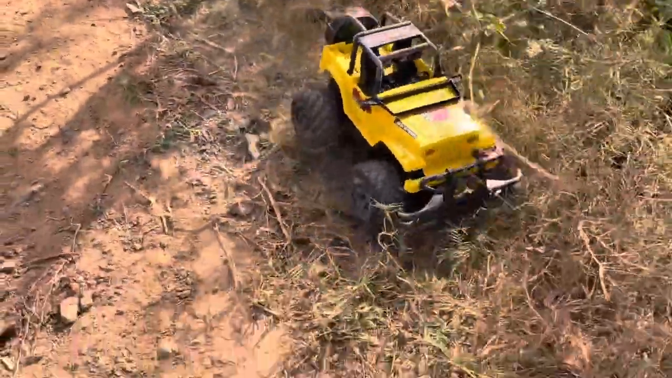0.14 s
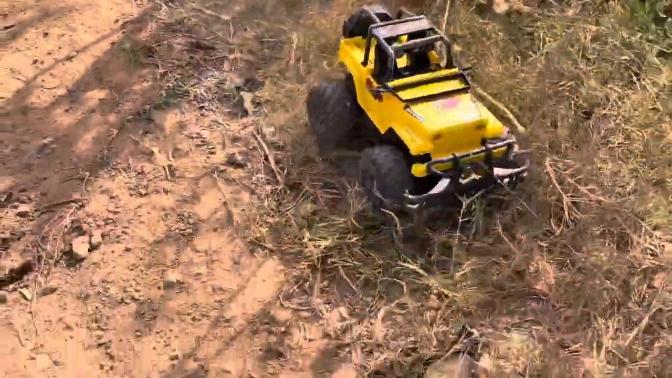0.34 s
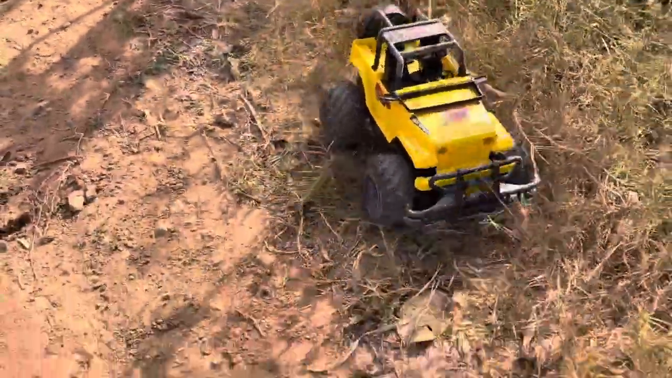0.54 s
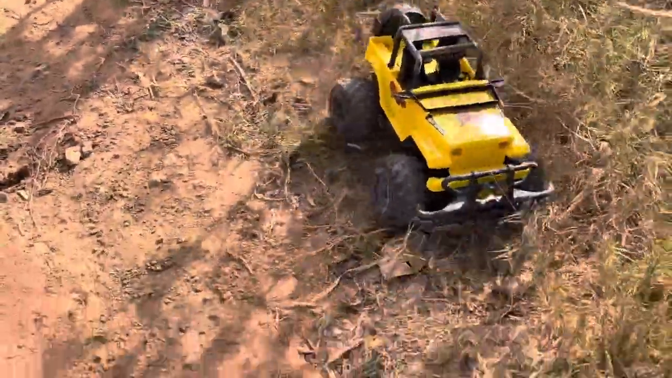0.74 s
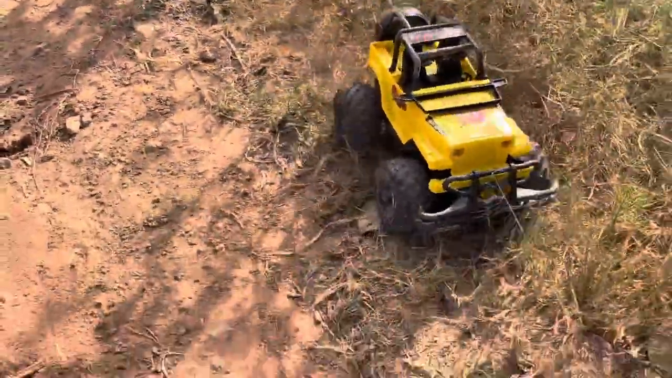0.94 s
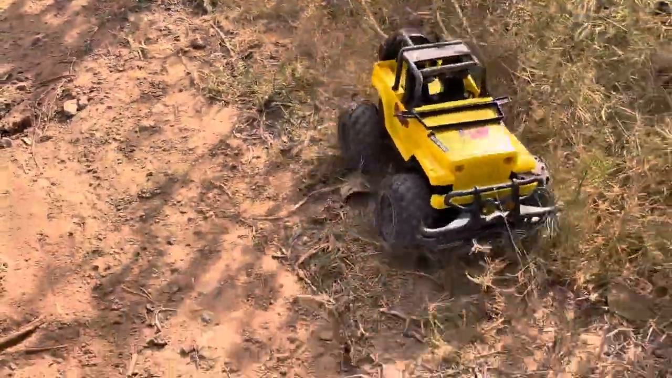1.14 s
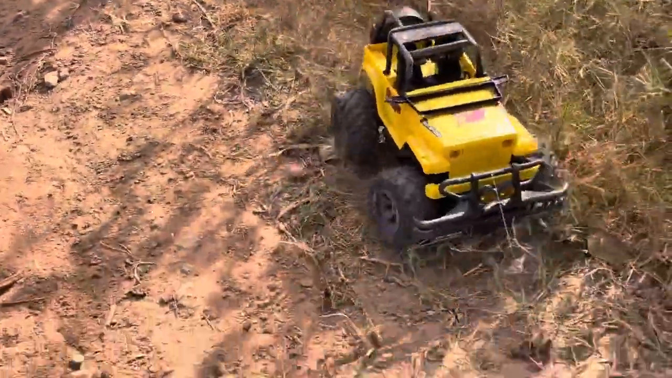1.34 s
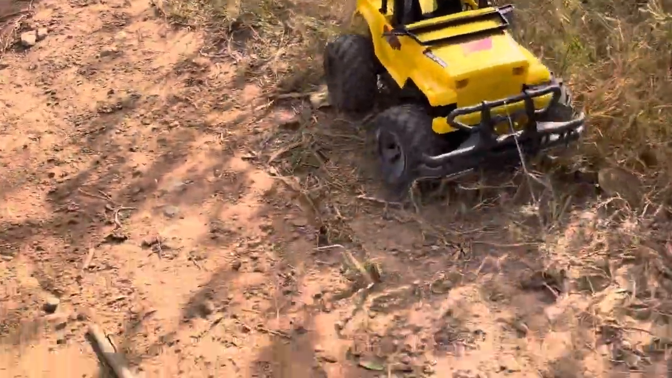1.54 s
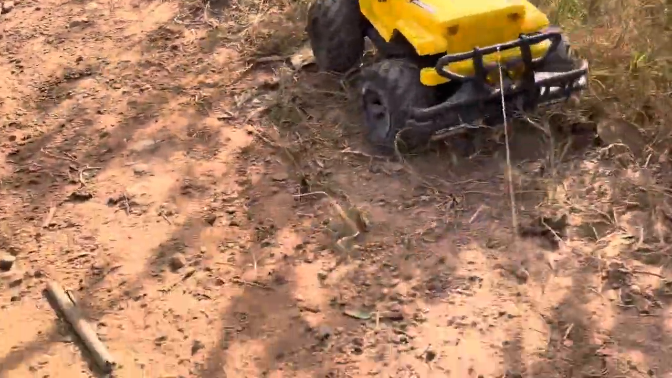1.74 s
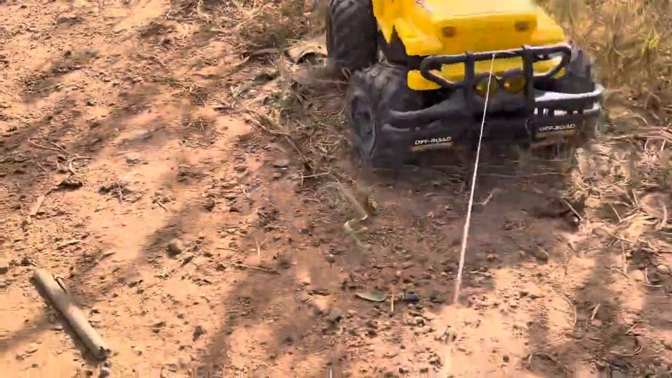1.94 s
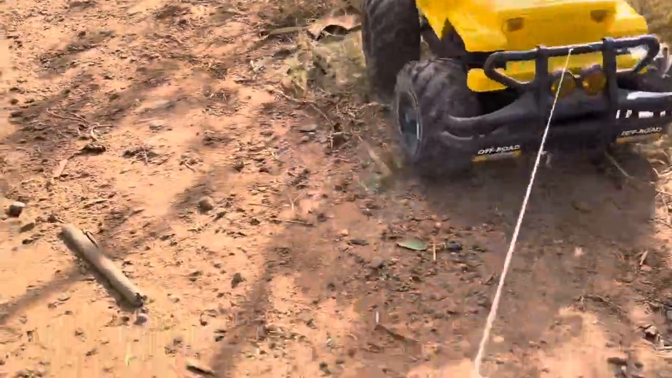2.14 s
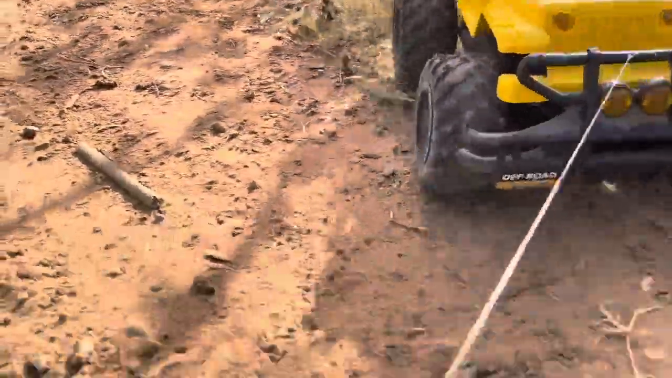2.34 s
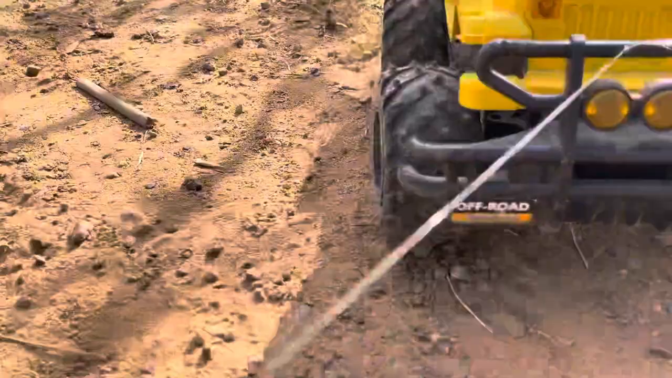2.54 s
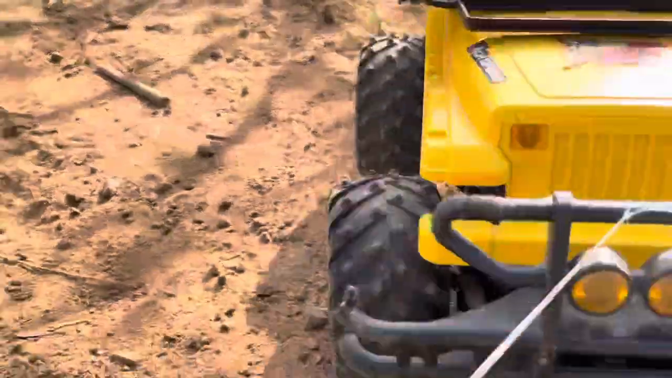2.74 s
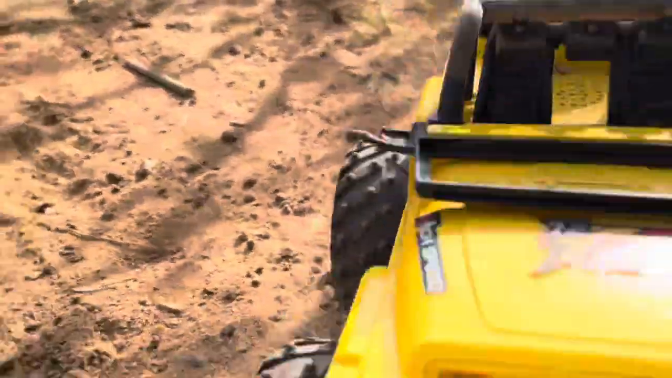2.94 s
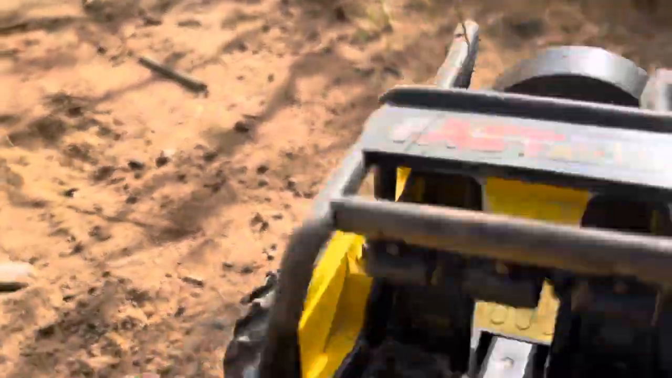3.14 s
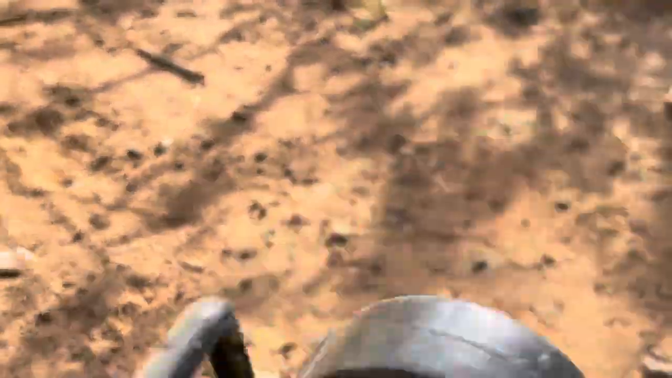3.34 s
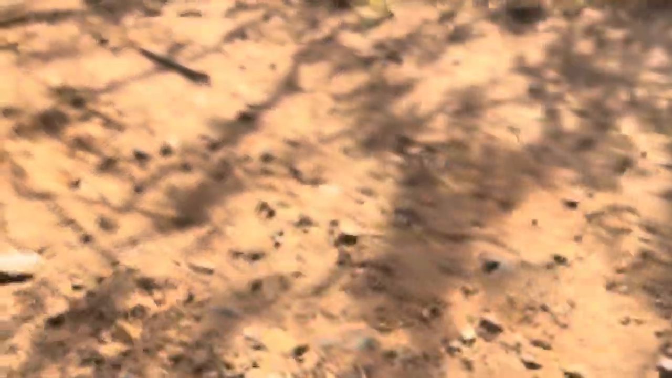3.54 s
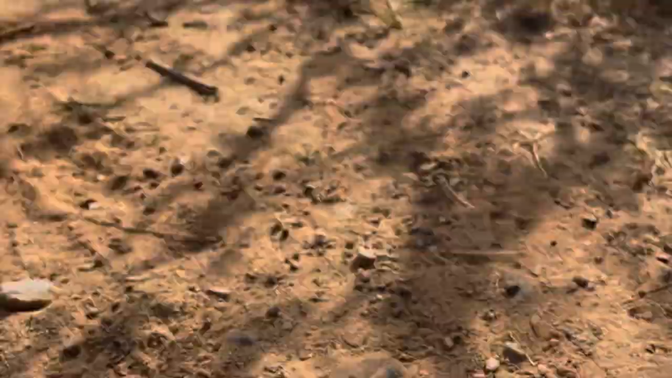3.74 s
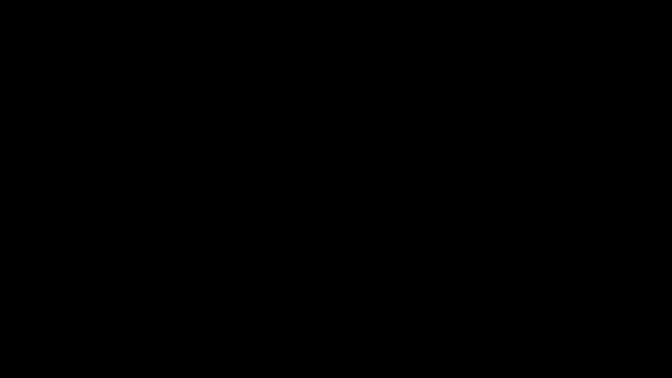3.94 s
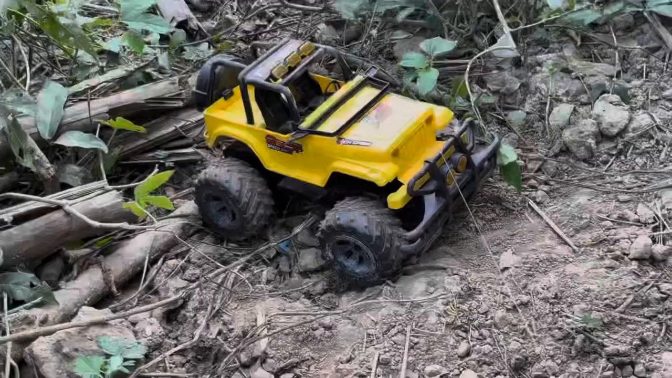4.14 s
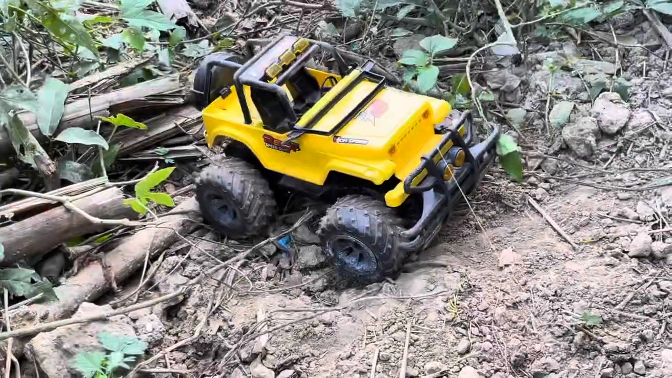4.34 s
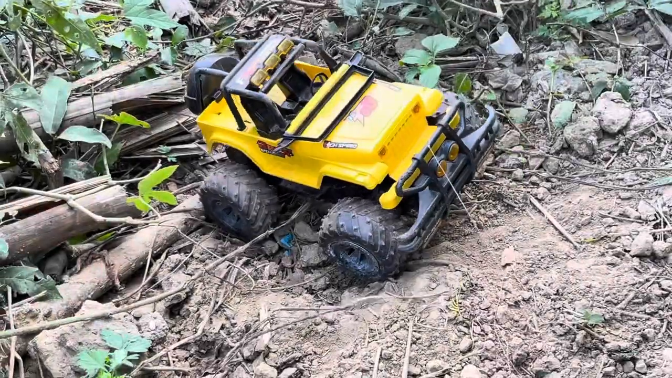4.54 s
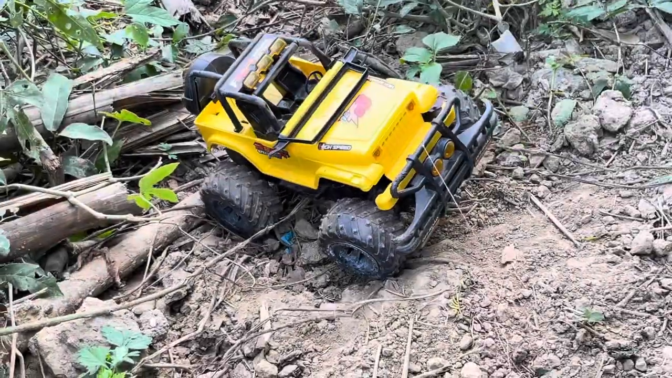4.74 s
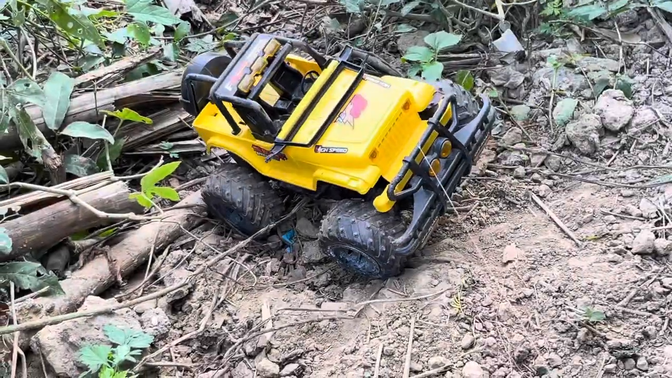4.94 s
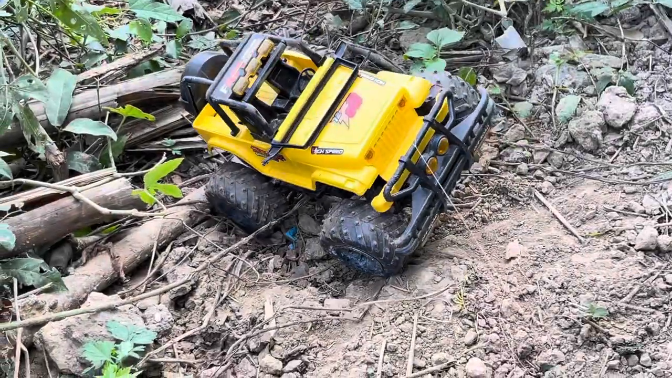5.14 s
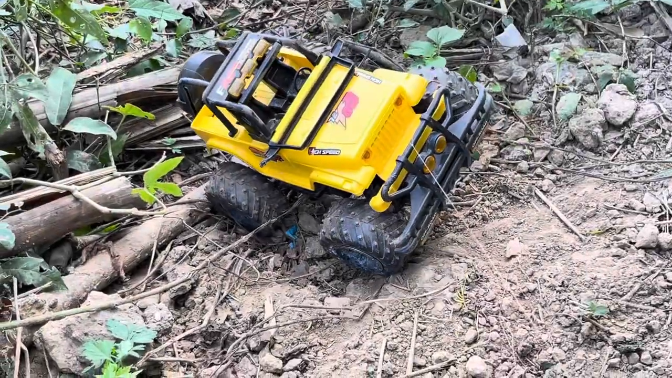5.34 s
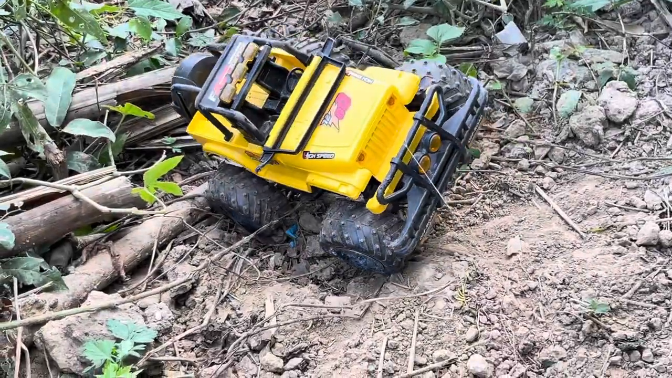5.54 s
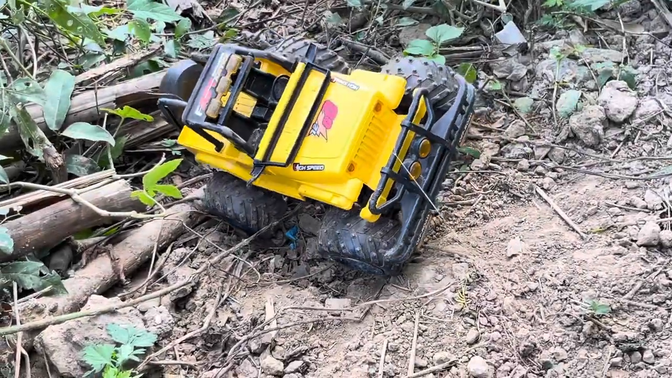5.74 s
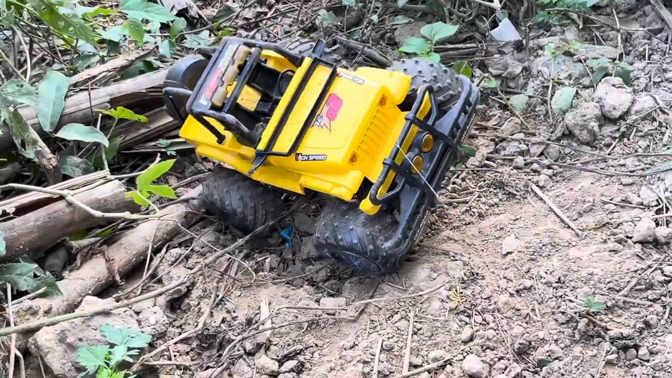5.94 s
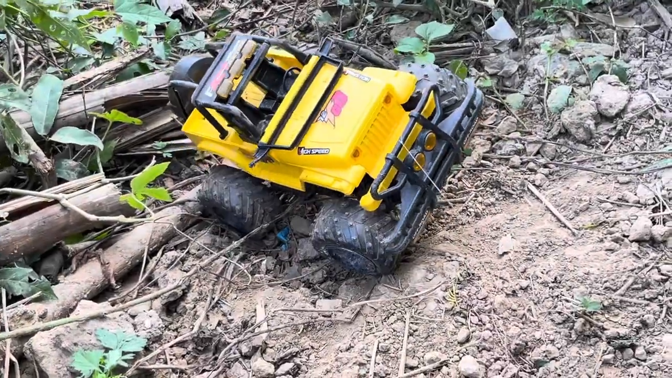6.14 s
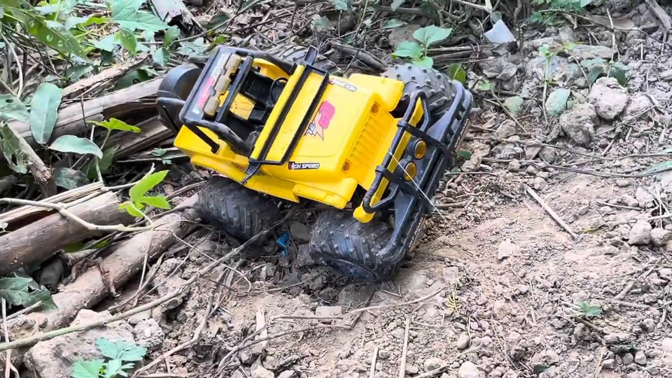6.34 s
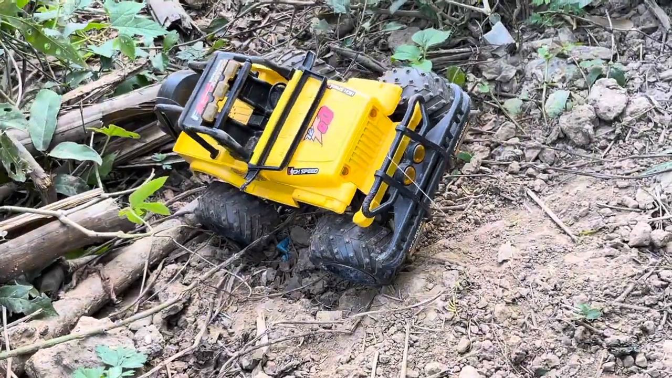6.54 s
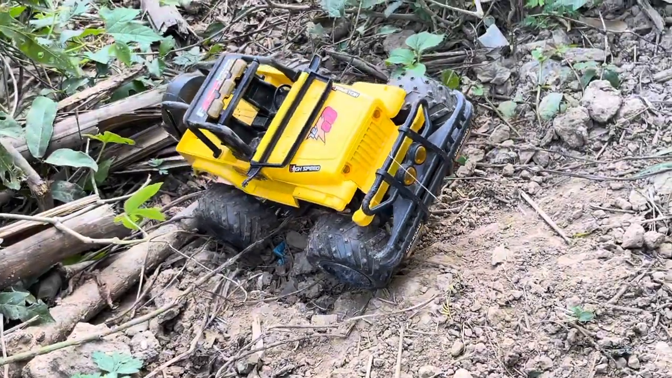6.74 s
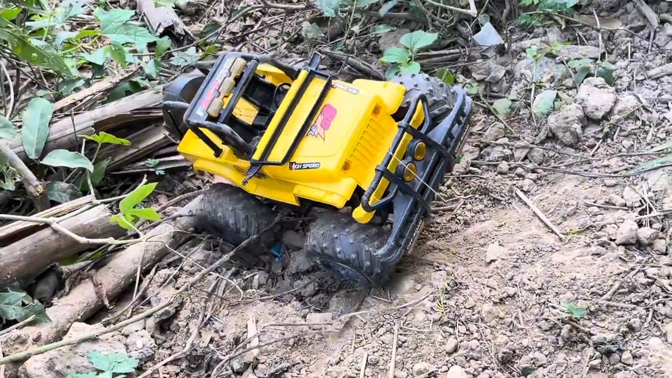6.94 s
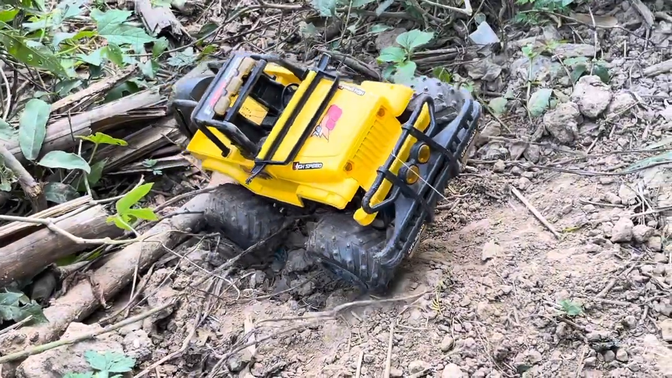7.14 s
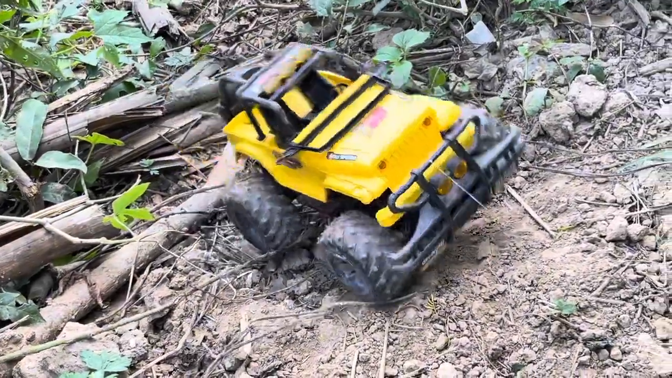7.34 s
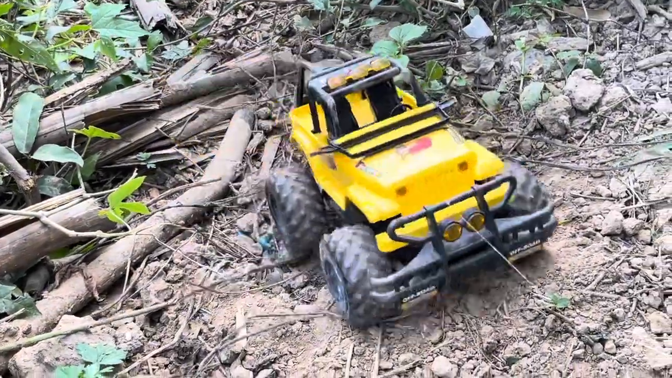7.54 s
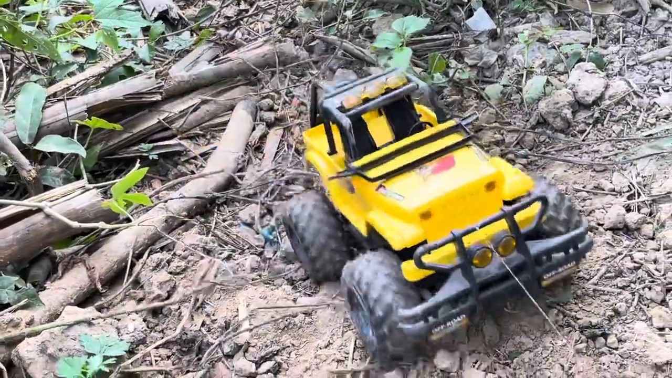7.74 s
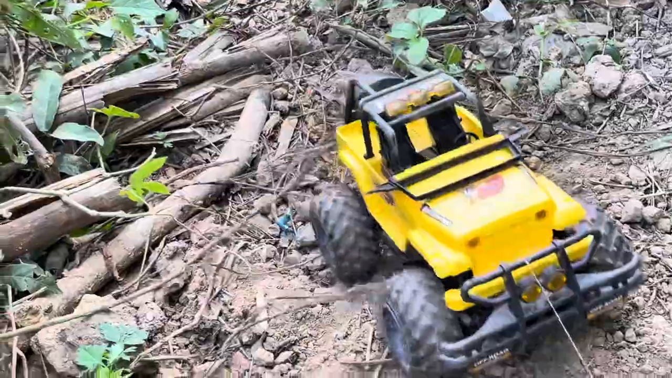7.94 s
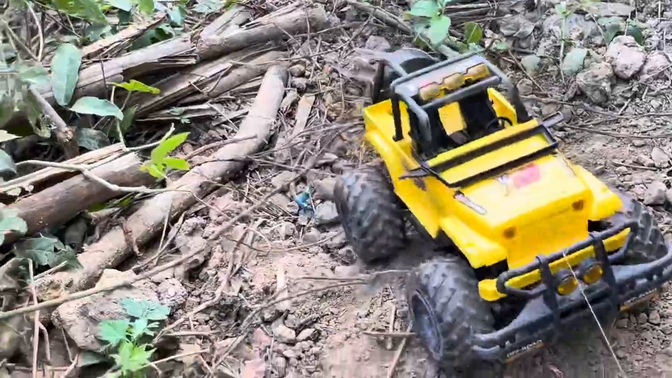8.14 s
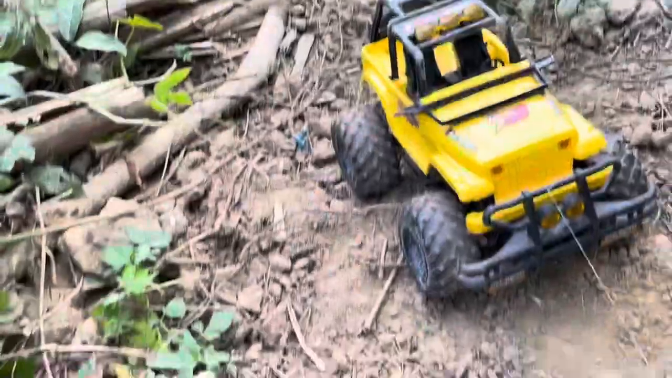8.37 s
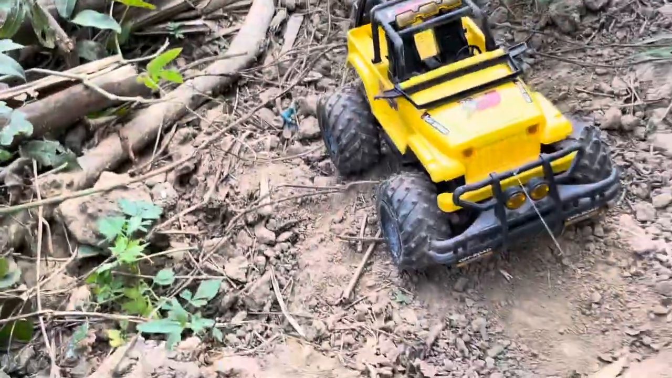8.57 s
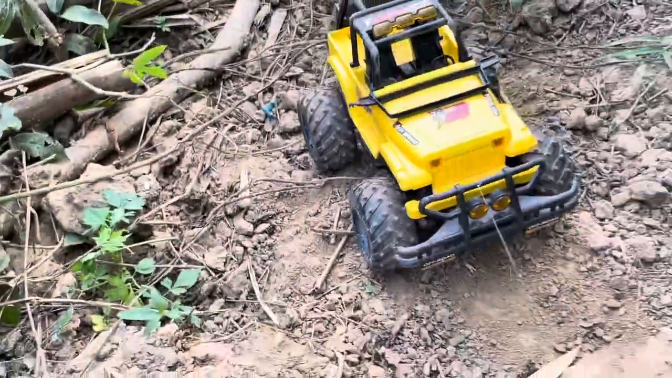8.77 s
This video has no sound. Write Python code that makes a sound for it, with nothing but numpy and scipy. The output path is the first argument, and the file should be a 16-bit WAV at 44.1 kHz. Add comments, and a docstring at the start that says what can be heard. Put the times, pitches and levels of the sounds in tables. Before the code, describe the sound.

Dry stems snap and grit crackles loudly as a toy truck passes close, then a quiet wood with distant engine thuds, rasping calls and gear ticks.

```python
"""In a wood, a plastic toy truck is pulled on a string through dry grass, over gritty soil and past the microphone.
Then, in another spot, it strains at a rut, lurches free and rolls on with its gears ticking.
Rubbing and breakage are coloured noise under chance envelopes; snaps, knocks and ticks are decaying bursts.
Behind it a far diesel thuds as a filtered pulse train, and something in the bushes, perhaps a bird,
rasps as pulses ringing resonances; a drone, rising hums, chirps and a faint hiss lie behind."""
import sys
import numpy as np
from scipy import signal
from scipy.fft import rfft, irfft
from scipy.io import wavfile
from scipy.ndimage import uniform_filter1d

SR = 44100
rng = np.random.default_rng(int(sys.argv[2]) if len(sys.argv) > 2 else 0)


def wrap_up_sound(samples):
    """Save the sound to the file named by the first command line argument, as 16-bit audio."""
    columns = np.atleast_2d(samples).T
    # keep every value between -1 and 1, then stretch to whole-number steps
    tamed = np.clip(columns, -1, 1)
    steps = np.round(tamed * 32767).astype(np.int16)
    wavfile.write(sys.argv[1], SR, steps)


N = 388319
TIME = np.arange(N) / SR

CUT_S, RESUME_S = 3.964, 3.973  # the first spot ends, the second begins
SOIL_S = 1.62  # the wheels leave the grass here
# spectrum of crushed grit and soil: f/Hz, density/dB per Hz (relative)
GRIT_COLOUR = [(120, -45), (200, -3), (504, -3.5), (630, -1), (762, 0.5), (852, -2), (1420, 0.5),
               (2050, 0.5), (2520, -4), (2770, -5), (4680, -8), (6540, -14), (9000, -18.5), (11700, -60.5),
               (19800, -120)]
# spectrum of a bright dry fracture: f/Hz, density/dB per Hz (relative)
SNAP_COLOUR = [(800, -22), (2000, 4), (3500, 2.5), (5500, 2), (8300, 5.5), (9500, 7.5), (10300, -10),
               (11500, -1), (13000, -16.5), (15500, -83)]


def undb(db):
    """Amplitude gain is ten to the power of a twentieth of the level in decibels."""
    return 10 ** (np.asarray(db) / 20)


def unit(x):
    """Normalisation to a root-mean-square of 1."""
    return x / np.sqrt(np.mean(x ** 2) + 1e-18)


def curves(table):
    """Linear interpolation in time of each column after the first."""
    s, *columns = np.transpose(table)
    return [np.interp(TIME, s, c) for c in columns]


def gains(points, hz):
    """Frequency response: levels interpolated along a logarithmic frequency axis."""
    f, db = np.transpose(points)
    return undb(np.interp(np.log(hz + 1), np.log(f), db))


def colour(x, points, size=8192):
    """Minimum-phase filtering: a folded cepstrum gives a causal response, scaled to keep white-noise power."""
    cepstrum = irfft(np.log(gains(points, np.arange(size // 2 + 1) * SR / size)))
    cepstrum[1:size // 2] *= 2
    cepstrum[size // 2 + 1:] = 0
    response = irfft(np.exp(rfft(cepstrum)))
    return signal.fftconvolve(x, response / np.linalg.norm(response))[:len(x)]


def resonate(x, hz, width_hz):
    """Second-order resonance with gain 1 at its centre."""
    return signal.lfilter(*signal.iirpeak(hz, hz / width_hz, fs=SR), x)


def walk(rate):
    """Slow random modulation: held random values smoothed twice, with a spread near 1."""
    k = max(int(SR / rate), 1)
    steps = np.repeat(rng.standard_normal(N // k + 1), k)
    return unit(uniform_filter1d(uniform_filter1d(steps, k), k))[:N]


def between(start, end, fade):
    """Gating window: 1 between two times, with linear fades inside its edges."""
    return np.clip((TIME - start) / fade, 0, 1) * np.clip((end - TIME) / fade, 0, 1)


def add(track, s, sound):
    """Superposition of a sound on a track from a given time."""
    i = max(int(s * SR), 0)
    track[i:i + len(sound)] += sound[:max(N - i, 0)]


def burst(t60, size=8192):
    """Exponential decay of white noise, falling 60 dB in t60 seconds (2 ms at least)."""
    return rng.standard_normal(size) * np.exp(-np.log(1000) * np.arange(size) / SR / max(t60, .002))


def stereo(x, pan_db=0, width_db=0, spread_db=-40, spread_hz=10):
    """Mid-side stereo: a quadrature side gives width, a wandering side scatter, an in-phase side a lean."""
    # side minus mid before width_db: f/Hz, level/dB
    width_colour = [(60, -20.5), (300, -8.5), (1300, -4), (4500, -30.5), (6800, -29), (8300, -16),
                    (9500, 14.5), (12000, 8.5), (15000, 8)]
    # scatter before spread_db, strongest in the middle of the range: f/Hz, level/dB
    spread_colour = [(100, -7.5), (500, -15), (1300, -1), (2500, -4.5), (5000, -4), (8000, -1),
                     (12000, -5.5)]
    # how strongly each band leans to the side of the source: f/Hz, level/dB
    lean_colour = [(60, -4.5), (700, -6), (1300, 2.5), (4500, 3.5), (8000, 1), (15000, -16)]
    hz, spectrum = np.arange(N // 2 + 1) * SR / N, rfft(x)
    side = irfft(spectrum * 1j * gains(width_colour, hz), N) * undb(width_db)
    side += undb(spread_db) * irfft(spectrum * gains(spread_colour, hz), N) * walk(spread_hz)
    if np.any(pan_db):
        balance = (undb(pan_db) - 1) / (undb(pan_db) + 1)
        side += irfft(spectrum * gains(lean_colour, hz), N) * balance
    return np.array([x + side, x - side])


def biting():
    """Power addition: each bite of the tread swells over steady rubbing; returns a level in dB."""
    # rubbing as the pull varies, through the grass and past the microphone: t/s, level/dB
    pull = [(0, -54), (.44, -48), (.68, -52.5), (.78, -41), (.92, -52), (1.28, -43), (1.52, -58),
            (1.8, -52), (1.93, -47.5), (2.15, -48.5), (2.19, -35), (2.48, -34), (2.63, -34), (2.8, -31),
            (2.93, -30), (3.16, -37.5), (3.45, -38.5), (3.62, -36), (3.96, -46)]
    # the tread bites into the soil and lets go: t/s at the top, level/dB, length/s
    bites = [(1.908, -45.5, 0.034), (1.967, -43.5, 0.021), (1.989, -52, 0.016), (2.098, -40.5, 0.043),
             (2.196, -25.5, 0.0078), (2.23, -31.5, 0.011), (2.246, -34.5, 0.026), (2.296, -31, 0.038),
             (2.425, -34.5, 0.015), (2.531, -24, 0.026), (2.58, -36, 0.035), (2.687, -26, 0.017),
             (2.707, -22.5, 0.029), (2.742, -25, 0.025), (2.769, -26, 0.024), (2.828, -27, 0.032),
             (2.907, -20.5, 0.019), (2.977, -29, 0.022), (3.009, -24.5, 0.051), (3.053, -26.5, 0.029),
             (3.122, -24, 0.043), (3.179, -29.5, 0.016), (3.222, -23.5, .035), (3.262, -29, 0.027),
             (3.307, -26.5, 0.044), (3.342, -32, 0.029), (3.39, -24, 0.049), (3.464, -25.5, 0.026),
             (3.515, -41, 0.027), (3.783, -50, 0.027), (3.874, -37, 0.048)]
    power = undb(curves(pull)[0]) ** 2
    for s, db, length in bites:
        power = power + undb(db) ** 2 * np.exp(-np.minimum((2 * (TIME - s) / length) ** 2, 20))
    return 10 * np.log10(power)


def tonal_grain(rate, spread_db, cycles, count=36):
    """Impulse excitation of resonators: sparse narrow rings at chance pitches give the crackle a tonal grain."""
    out = np.zeros(N)
    for hz in np.geomspace(500, 10000, count) * rng.uniform(.96, 1.04, count):
        taps = np.zeros(N)
        draws = rng.random((int(rate * N / SR / count), 2))
        places = (draws[:, 0] * N).astype(int)
        taps[places] = undb(-spread_db * np.log(0.0292 + 0.92 * draws[:, 1]))
        # flat on average
        out += np.sqrt(hz) * unit(resonate(taps, hz, hz / cycles))
    return unit(out)


def fractures(rate, spread_db, t60, bed):
    """Random point process: many tiny breaks of unequal size decay over a bed of rubbing; rms 1."""
    largest = 3  # limit on the exponential draw
    sizes = undb(spread_db * np.minimum(rng.exponential(size=N), largest)) * (rng.random(N) < rate / SR)
    power = signal.lfilter([1], [1, -np.exp(-2 * np.log(1000) / (t60 * SR))], sizes ** 2)
    # even out the local mean power
    power = power / (uniform_filter1d(power, size=1500) + 1e-9)
    return unit(np.sqrt(np.abs(power) + bed ** 2))


def crackle_of(work_db, db, slope):
    """Linear level law: dry crackle is at db when the wheels are at -45 dB and grows by slope dB per dB."""
    return db + slope * (work_db + 45)


def wheels(ground, rings, grit_db, crackle_db, rate, spread_db, bed):
    """Amplitude-modulated noise: tyres crush crumbs and blades, many breaks sounding both low and high."""
    # spectrum of breaking dry blades: f/Hz, density/dB per Hz (relative)
    crackle_colour = [(1000, -26.5), (2200, 3.5), (3400, -1), (5500, -3.5), (7000, -6.5), (8600, 2),
                      (9500, 2.5), (10300, -15.5), (11500, -2.5), (13000, -34), (15500, -22.5)]
    shared = fractures(rate, spread_db, t60=0.02, bed=bed)
    low_only = fractures(rate=300, spread_db=2.5, t60=0.018, bed=bed)
    grit = (rng.standard_normal(N) + rings) * (shared + low_only)
    crackle = (rng.standard_normal(N) + rings) * shared
    return unit(colour(grit, ground)) * undb(grit_db) + unit(colour(crackle, crackle_colour)) * undb(crackle_db)


def crush(t60, rise_s, ring_db, grain_db=2.5, size=50):
    """Progressive fracture: fibres give way in a quick grainy swell and ring at five chance pitches."""
    noise = burst(np.clip(t60, .006, .16))
    grains = unit(uniform_filter1d(rng.standard_normal(len(noise)), size))
    noise *= unit(undb(grain_db * np.clip(grains, -2, 2)))
    noise *= 1 - np.exp(-np.arange(len(noise)) / SR / rise_s)
    pitches = np.exp(rng.uniform(np.log(1200), np.log(9500), size=5))
    return noise + undb(ring_db) * sum(resonate(noise, hz, 86) for hz in pitches)


def snaps(bright_db, crunch_db, soil_db, rise_s, ring_db):
    """Brittle fracture: stems break brightly while the ground crunches below, more on soil than in grass."""
    # dry stems snap: t/s, relative level/dB, t60/s (before crush limits it)
    stems = [(0.0677, -42, 0.072), (0.3176, -34, 0.23), (0.4045, -30, 0.2), (0.459, -26, 0.052),
             (0.7333, -24, 0.12), (0.7552, -18.5, 0.1), (.794, -31, 0.17), (0.835, -24.5, 0.051),
             (.856, -29.5, 0.082), (1.203, -23, 0.11), (1.2245, -19.5, 0.1), (1.257, -23.5, .18),
             (1.277, -22, .04), (1.288, -18, 0.038), (1.329, -27, 0.049), (1.338, -13.5, 0.046),
             (1.3688, -16, 0.022), (1.4031, -20.5, 0.07), (1.4518, -29, 0.09), (1.4686, -18, 0.022),
             (1.537, -25.5, 0.036), (1.58, -27, 0.074), (2.191, -15, 0.021), (2.354, -18, .025),
             (2.418, -24, 0.06), (2.447, -24, 0.031), (2.548, -16, 0.028), (2.614, -16.5, 0.02),
             (2.682, -20, 0.04), (2.6937, -14, 0.028), (2.8336, -8.5, 0.021), (2.9015, -12, 0.04),
             (3.006, -20, 0.089), (3.14, -20, 0.07), (3.368, -11, 0.11), (3.381, -7, 0.054),
             (3.4097, -8.5, 0.035), (3.4518, -11, 0.044), (3.494, -7, 0.047), (3.5146, -14, 0.065),
             (3.5392, -17.5, 0.07), (3.59, -14, 0.018), (3.713, -17.5, 0.066), (3.734, -22, 0.051),
             (3.75, -13, 0.052), (3.779, -17, 0.11), (3.806, -14.5, 0.033), (3.8576, -12, 0.036),
             (3.948, -17.5, 0.027), (4.365, -44, 0.19), (4.395, -38, 0.059), (4.4546, -34, 0.11),
             (4.5283, -39.5, 0.037), (5.44, -46.5, 0.058), (7.358, -31, 0.023), (7.401, -42, 0.024),
             (7.4184, -28.5, 0.062), (7.445, -40, 0.032)]
    out = np.zeros(N)
    for s, db, t60 in stems:
        add(out, s, undb(db) * crush(t60, rise_s, ring_db))
    crunch_gain = undb(crunch_db + soil_db * (TIME > SOIL_S))
    return undb(bright_db) * colour(out, SNAP_COLOUR) + crunch_gain * colour(out, GRIT_COLOUR)


def clicks(level_db, body_db):
    """Impact of hard bodies: grit cracks very briefly on the plastic shell over a duller, longer body."""
    # grit on the shell: t/s, relative level/dB, t60/s of the crack
    impacts = [(0.068, -32, .008), (1.022, -24, .015), (2.3641, -4, .009), (2.474, -3, .018),
               (2.656, -3, .013), (2.695, -2.5, .006), (3.0403, -13, 0.0062), (3.2048, -5, 0.0037),
               (3.4922, -0.5, 0.02), (3.575, 5.5, 0.0069), (3.5768, 4.5, .005), (3.607, 1.5, 0.0053),
               (3.6297, 1, 0.007), (3.6332, -0.5, 0.012), (3.6805, 0.5, .006), (4.369, -22.5, 0.0093)]
    crack, body = np.zeros(N), np.zeros(N)
    for s, db, t60 in impacts:
        add(crack, s, undb(db + level_db) * burst(t60))
        add(body, s, undb(db + body_db) * burst(t60=0.036))
    return colour(crack, SNAP_COLOUR) + colour(body, GRIT_COLOUR)


def knocks(level_db, width_hz, t60, crunch_db, crunch_t60):
    """Damped resonance: pebbles strike the soft tyres dully, and grit crunches under each."""
    # pebbles against the wheels: t/s, relative level/dB, centre f/Hz
    pebbles = [(0.088, -37, 1360), (0.413, -41, 650), (0.598, -47, 685), (0.975, -37, 1460),
               (1.027, -34, 1250), (1.076, -31, 1120), (1.146, -31, 840), (1.156, -28, 2250),
               (1.183, -33, 1290), (1.913, -39, 1280), (1.963, -38, 1340), (1.974, -38, 600),
               (2.0, -39, 620), (5.091, -52, 493), (5.093, -52.5, 1450), (5.118, -57, 1500),
               (6.676, -46.5, 1900), (7.324, -41, 541), (7.383, -30, 1060), (7.412, -33, 1600),
               (7.417, -31, 520), (7.437, -30.5, 800), (7.454, -42, 1190), (7.506, -47, 1300),
               (8.015, -38, 1000), (8.047, -45, 774), (8.1435, -30.5, 940), (8.423, -38, 1280),
               (8.47, -37, 770), (8.53, -38.5, 960), (8.659, -39, 900), (8.72, -39, 1100),
               (8.761, -33, 1400), (8.771, -25, 800)]
    out, crunch = np.zeros(N), np.zeros(N)
    for s, db, hz in pebbles:
        ring = resonate(resonate(burst(t60), hz, width_hz), hz, 2 * width_hz)
        add(out, s, undb(db + level_db) * ring / np.abs(ring).max())
        add(crunch, s, undb(db + crunch_db) * burst(crunch_t60))
    return out + colour(crunch, GRIT_COLOUR)


def rough_tones(table, width_hz, fade):
    """Narrow-band noise: each short, rough sound sits in one resonance."""
    out = np.zeros(N)
    for start, end, hz, db in table:
        ring = resonate(resonate(rng.standard_normal(N), hz, width_hz), hz, width_hz)
        out += undb(db) * unit(ring) * between(start, end, fade)
    return out


def clods(bright_db, crunch_db, t60, rise_s, ring_db):
    """Granular collapse: lumps of soil burst under a tyre with a low crunch and a short bright edge."""
    # bursting lumps: t/s, relative level/dB
    lumps = [(0.596, -40), (2.173, -29), (2.3629, -24), (2.475, -22), (2.6517, -18.5), (2.9744, -14.5),
             (3.0384, -19.5), (3.2045, -16), (3.714, -31), (4.365, -43.5), (7.3501, -31), (7.765, -37.5),
             (8.748, -37), (8.769, -39)]
    out = np.zeros(N)
    for s, db in lumps:
        add(out, s, undb(db) * crush(t60, rise_s, ring_db))
    return undb(bright_db) * colour(out, SNAP_COLOUR) + undb(crunch_db) * colour(out, GRIT_COLOUR)


def gears(level_db, t60):
    """Impulsive excitation: each slip of a tooth rattles the plastic gearbox."""
    # ticks as the wheels turn: t/s, relative level/dB
    teeth = [(7.077, -39), (7.475, -26), (7.561, -28.5), (7.653, -30), (7.739, -30.5), (7.826, -27.5),
             (7.905, -26.5), (8.062, -31.5), (8.135, -40), (8.207, -44), (8.28, -42.5), (8.35, -39),
             (8.422, -34.5)]
    # spectrum of the gearbox: f/Hz, density/dB per Hz (relative)
    gearbox_colour = [(600, 6), (2000, 4), (3300, 14.5), (4500, 7), (6500, 8.5), (8600, 12), (10200, 0),
                      (11500, 2.5), (15000, -52)]
    out = np.zeros(N)
    for s, db in teeth:
        add(out, s, undb(db + level_db) * burst(t60))
    return colour(out, gearbox_colour)


def lurching():
    """Power addition: each lurch rises and dies exponentially over the slow roll; returns a level in dB."""
    # rubbing in the second spot, between the lurches: t/s, level/dB
    pull = [(7.28, -36), (7.34, -56), (7.37, -49), (7.5, -47), (7.63, -53.5), (7.77, -48), (7.96, -64),
            (8.3, -62), (8.81, -52)]
    # a tug on the string makes the truck lurch: t/s at the top, level/dB
    tugs = [(7.429, -34), (8.457, -41.5), (8.778, -32.5)]
    rise_db_per_s, fall_db_per_s = 209, 295
    power = undb(curves(pull)[0]) ** 2
    for s, db in tugs:
        drop_db = np.maximum((s - TIME) * rise_db_per_s, (TIME - s) * fall_db_per_s)
        power = power + undb(db - drop_db) ** 2
    return 10 * np.log10(power)


def truck():
    """Superposition of rolling noise, hollow rumble and impacts: grass, soil, then out of the rut."""
    # spectrum of rubbing through grass: f/Hz, density/dB per Hz (relative)
    grass_colour = [(180, -65), (300, -28), (514, -13), (636, -6.5), (1690, -7), (2120, 0), (2830, -16.5),
                    (3460, -1), (4170, -17), (6000, -15), (7800, -25), (13200, -120)]
    # spectrum of the hollow tyres and chassis: f/Hz, density/dB per Hz (relative)
    chassis_colour = [(18, -50), (28, -37), (42, -6), (70, 1), (130, 2), (230, -4.5), (400, -5),
                      (800, -38.5), (3000, -74)]
    # lean of the truck, before each band's weighting: t/s, left minus right level/dB
    place = [(1.3, 0), (2.3, 1.4), (3.3, 1.8), (3.9, .9), (4.0, 0)]
    # left-right scatter of the small sounds, before its colour: t/s, level/dB
    scatter = [(1.6, -8), (2.4, -17.5), (3.05, -12.5), (3.35, -5), (3.6, -0.5), (3.8, 0.5), (3.96, 1.5),
               (4.0, -16)]
    # the plastic body creaks: start t/s, end t/s, f/Hz, level/dB
    creaks = [(.405, .432, 670, -45.5), (2.38, 2.415, 1960, -31), (2.545, 2.585, 2020, -26),
              (2.695, 2.73, 4000, -29.5), (2.82, 2.865, 2020, -30.5), (7.73, 7.76, 2290, -44)]
    # a dry leaf swishes along the tyre: start t/s, end t/s, f/Hz, level/dB
    swishes = [(.56, .64, 2400, -42.5), (8.72, 8.84, 8460, -31.5)]
    # a dry stalk pings: start t/s, end t/s, f/Hz, level/dB
    pings = [(1.503, 1.511, 9100, -45)]

    first, second = between(-1, CUT_S, .003), between(7.29, 10, .04)
    on_soil = between(SOIL_S, 10, 0.031)
    rings = undb(-4.0) * tonal_grain(rate=2200, spread_db=4.5, cycles=57)

    work_db = biting()
    crackle_db = crackle_of(work_db, db=-45, slope=0.42)
    grass = wheels(grass_colour, rings, work_db, crackle_db, rate=400, spread_db=2.5, bed=0.8)
    crackle_db = crackle_of(work_db, db=-47.5, slope=0.52)
    soil = wheels(GRIT_COLOUR, rings, work_db, crackle_db, rate=450, spread_db=8.0, bed=0.68)

    # the rumble follows the wheels and is far stronger right beside the microphone
    passes_s, pass_lasts_s, beside_db = 3.322, 0.25, 15.5
    beside = np.exp(-((TIME - passes_s) / pass_lasts_s) ** 2)
    rumble_db = work_db + (1 - on_soil) * -17 + on_soil * -17.5 + beside_db * beside
    rumble = unit(colour(rng.standard_normal(N), chassis_colour)) * undb(rumble_db) * first

    work_db = lurching()
    crackle_db = crackle_of(work_db, db=-52.5, slope=0.87)
    rut = wheels(GRIT_COLOUR, rings, work_db, crackle_db, rate=210, spread_db=14.0, bed=0.87)
    rolling = first * ((1 - on_soil) * grass + on_soil * soil) + second * rut

    hits = snaps(bright_db=-4, crunch_db=-29.0, soil_db=13.5, rise_s=0.003, ring_db=0.0)
    hits += clicks(level_db=-12.5, body_db=-29)
    hits += knocks(level_db=3.0, width_hz=730, t60=0.02, crunch_db=-14.5, crunch_t60=0.051)
    hits += rough_tones(creaks, width_hz=230, fade=0.0095)
    hits += rough_tones(swishes, width_hz=2400, fade=0.043)
    hits += clods(bright_db=-6, crunch_db=1.0, t60=0.061, rise_s=0.001, ring_db=0.5)
    hits += rough_tones(pings, width_hz=400, fade=.003)
    hits += gears(level_db=-6.5, t60=0.051)

    near = stereo(rolling + hits, curves(place)[0], width_db=-10.0, spread_db=curves(scatter)[0], spread_hz=900)
    return near + stereo(rumble, pan_db=2.0, width_db=-3.0, spread_db=-6, spread_hz=40)


def far_drone():
    """Amplitude-modulated low noise: a drone wavers far behind the first run."""
    # spectrum of the drone: f/Hz, density/dB per Hz (relative)
    drone_colour = [(22, -31), (40, -14), (60, 6), (90, 6), (130, 0.5), (200, -16.5), (400, -23),
                    (1500, -98)]
    # the drone before its waver: t/s, level/dB
    drone_level = [(0, -68), (.5, -57), (.8, -54), (1.35, -51), (1.55, -61.5), (2.1, -58)]
    waver_db = 1.1 * walk(5)
    drone = unit(colour(rng.standard_normal(N), drone_colour)) * undb(curves(drone_level)[0] + waver_db)
    return stereo(drone * between(-1, CUT_S, .003), spread_db=-31, spread_hz=28)


def air():
    """Broadband background noise: the faint, slightly restless hiss of the wood, low-passed at 9800 Hz."""
    # spectrum of the hiss: f/Hz, density/dB per Hz (relative)
    air_colour = [(120, -17.5), (200, -0.5), (239, -8.5), (338, -8.5), (361, -21), (461, -19), (620, -16),
                  (664, -11.5), (717, -19), (979, -19), (2110, -23), (2290, -22), (6220, -24), (8220, -16),
                  (10000, -22.5), (13000, -84), (22000, -120)]
    hiss = unit(colour(rng.standard_normal(N), air_colour)) * undb(-60.5 + .5 * walk(1.0))
    return stereo(signal.sosfilt(signal.butter(12, 9800, fs=SR, output="sos"), hiss), width_db=-1.0)


def brief_hum(table):
    """Frequency modulation: a faint low sine rises a little, wobbles and fades."""
    hz, db = curves(table)
    phase = 2 * np.pi * np.cumsum(hz * (1 + 0.0056 * walk(12))) / SR
    return stereo(undb(db) * np.sin(phase) * between(table[0][0], table[-1][0], .02))


def rasp_ring(turns, pulse_hz, ring_hz, sharpness, roughness):
    """Pulsed formant: every pulse rings one resonance; sharper pulses widen it, unlike phases roughen it."""
    pulse = np.round(turns).astype(int)
    slips = rng.standard_normal(256)[pulse % 256]
    shape = np.exp(sharpness * (np.cos(2 * np.pi * turns) - 1))
    return shape * np.sin(2 * np.pi * ring_hz * (turns - pulse) / pulse_hz + roughness * slips)


def rasps(level_db, release_s, echo_t60):
    """Source-filter principle: fast pulses ring throat resonances; calls sag at both ends and roughen in patches."""
    # calls: start t/s, end t/s, relative level/dB, pulse rate/Hz, rise over the call (share), attack/s,
    # roughness/rad at the start and at the end (before the patches), echo level/dB against the call
    call_table = [(1.53, 1.836, -54, 133, .10, 0.053, .4, .7, -12),
                  (3.899, 4.35, -59, 154, -0.014, .06, 2.3, 1.9, 11),
                  (5.845, 6.303, -56.5, 140, 0.02, 0.037, 0.76, 1.2, -8.5),
                  (6.935, 7.38, -49.5, 161, 0.038, 0.066, 1.4, 1.1, -5),
                  (7.462, 7.895, -52.5, 146, -.03, 0.075, 1.2, 1.3, -9),
                  (7.905, 8.388, -47, 139, 0.027, 0.11, 0.63, 1.1, -13),
                  (8.43, 8.795, -49, 150, 0.095, 0.072, 0.53, 0.45, -7)]
    # resonances of the throat, one line per call: f/Hz (before the glide), level/dB,
    # sharpness of the pulse, growth over the call/dB
    throat = [
        [(1300, 0, 2, -2), (2400, 7, 3, 2)],
        [(2260, -2.5, 1.6, -2), (2570, -11, 2, -6), (3000, -3, 2.3, -8)],
        [(1745, -8, 1.8, -9), (2270, -0.5, 1.9, 5), (2470, -0.5, 1.55, -2), (3250, -14.5, 2, 10)],
        [(1700, -12, 1.1, 1), (2190, -2.5, 1.5, -1), (2900, -12.5, 0.62, 18), (3200, -16, 1.7, 10)],
        [(2150, -3, 2.6, -4), (2700, -7, 1, -4)],
        [(2120, -0.5, 1.04, -4), (2460, -12, 1.5, 0), (2930, -8, 0.99, 0), (3150, -11, 1.6, 0)],
        [(2030, -4, .8, 0), (2320, -2, 0.82, -3), (2710, 6, 1.5, 8)],
    ]
    sag, ring_lag = 0.0442, .15  # share of the pitch; share of a cycle behind the resonance before it
    out = np.zeros(N)
    wobble = 0.0048 * walk(25)  # share of the pulse rate
    patches = undb(3.5 * walk(16))
    flutters_db = [1 * walk(22) for _ in max(throat, key=len)]
    for call_row, rings in zip(call_table, throat):
        start, end, db, rate, rise, attack_s, rough_start, rough_end, echo_db = call_row
        t = np.arange(int((end - start) * SR)) / SR
        along = t / t[-1] - .5
        here = np.minimum(int(start * SR) + np.arange(len(t)), N - 1)
        glide = 1 + rise * along - sag * (2 * along) ** 4
        pulse_hz = rate * (glide + wobble[here])
        turns = np.cumsum(pulse_hz) / SR
        roughness = np.linspace(rough_start, rough_end, len(t)) * patches[here]
        voice = np.zeros(len(t))
        for k, (hz, ring_db, sharpness, growth_db) in enumerate(rings):
            ring = rasp_ring(turns - k * ring_lag, pulse_hz, hz * glide, sharpness, roughness)
            voice += undb(ring_db + growth_db * along + flutters_db[k][here]) * ring
        swell = np.clip(np.minimum(t / attack_s, (t[-1] - t) / release_s), 0, 1)
        # direct sound and echo share the power of the call
        call = undb(db + level_db) * swell * unit(voice) / np.hypot(1, undb(echo_db))
        add(out, start, call)
        # the bushes blur the pulses
        echo = burst(echo_t60)
        add(out, start, undb(echo_db) * signal.fftconvolve(call, echo / np.linalg.norm(echo)))
    return stereo(out, width_db=-1.0)


def diesel(lead_s, jitter_s, scatter_db, echo_db):
    """Filtered pulse train: one exhaust thud per firing, dulled by distance and smeared by the trees."""
    # firing rate of the single cylinder: t/s, f/Hz
    firing = [(4.0, 17.26), (4.6, 17.52), (5.2, 17.65), (5.8, 17.83), (6.4, 18.28), (7.0, 18.18),
              (7.6, 18.69), (8.2, 18.29), (8.8, 18.54)]
    # spectrum of a thud: f/Hz, density/dB per Hz (relative)
    exhaust_colour = [(18, -43.5), (35, -25), (53, 1.5), (70, -7.5), (90, 6), (122, 1.5), (142, 1),
                      (165, -11.5), (200, -18), (300, -30.5), (420, -76), (1500, -95)]
    turns = np.cumsum(curves(firing)[0]) / SR
    turns = turns - np.interp(firing[0][0], TIME, turns)
    pulses = np.zeros(N)
    for s in TIME[1:][np.diff(np.floor(turns)) > 0]:
        late, size = rng.standard_normal(2)
        add(pulses, s - lead_s + jitter_s * late, undb([scatter_db * size]))
    smear = unit(colour(rng.standard_normal(N), exhaust_colour))
    thuds = unit(colour(pulses, exhaust_colour)) + undb(echo_db) * smear
    # it slowly recedes, by 0.72 dB per second
    level = undb(-44 - 0.72 * (TIME - RESUME_S)) * between(RESUME_S, 10, 0.019)
    return stereo(thuds * level, width_db=-7.5)


def chirps(width_hz):
    """Narrow-band noise: small far birds, blurred by the trees."""
    # faint chirps: start t/s, end t/s, f/Hz, level/dB
    birds = [(5.63, 5.71, 2920, -65), (5.697, 5.847, 3600, -68)]
    return stereo(rough_tones(birds, width_hz, fade=0.034))


def scene():
    """Linear superposition: the truck in front of the sounds of the wood."""
    # two faint low hums that rise: t/s, f/Hz (before the wobble), level/dB
    first_hum = [(.17, 173, -80), (.22, 176.5, -52.5), (.33, 176, -58), (.385, 186.5, -52),
                 (.48, 193.7, -51), (.58, 192, -61), (.65, 202, -80)]
    second_hum = [(7.5, 333, -73), (7.62, 341, -61), (7.8, 350, -56.5), (7.95, 356, -73)]
    hums = brief_hum(first_hum) + brief_hum(second_hum)
    calls = rasps(level_db=-1.5, release_s=0.084, echo_t60=.08) + chirps(width_hz=740)
    engine = diesel(lead_s=0.00938, jitter_s=.0015, scatter_db=1.3, echo_db=-9)
    return truck() + far_drone() + air() + hums + calls + engine


def record(dry):
    """Soft saturation rounds the loudest peaks; a steep elliptic low-pass then cuts the top."""
    ceiling, top_hz = .92, 15900  # share of full scale; edge of the low-pass
    rounded = dry / (1 + (dry / ceiling) ** 4) ** .25
    return signal.sosfilt(signal.ellip(8, .2, 70, top_hz, fs=SR, output="sos"), rounded)


dry = scene()
out = record(dry)
wrap_up_sound(out)
```